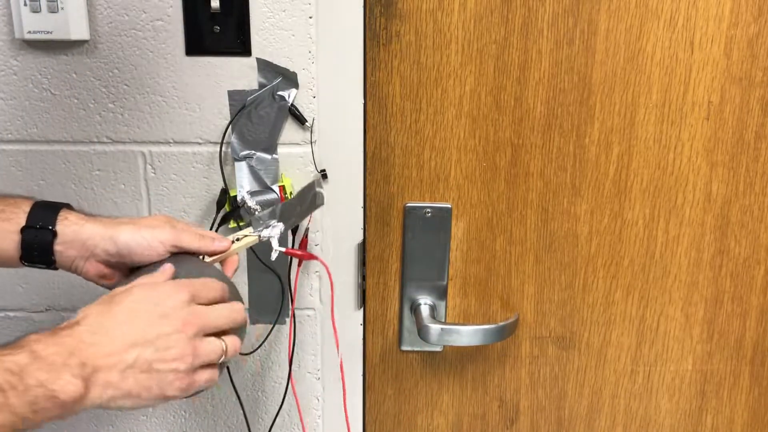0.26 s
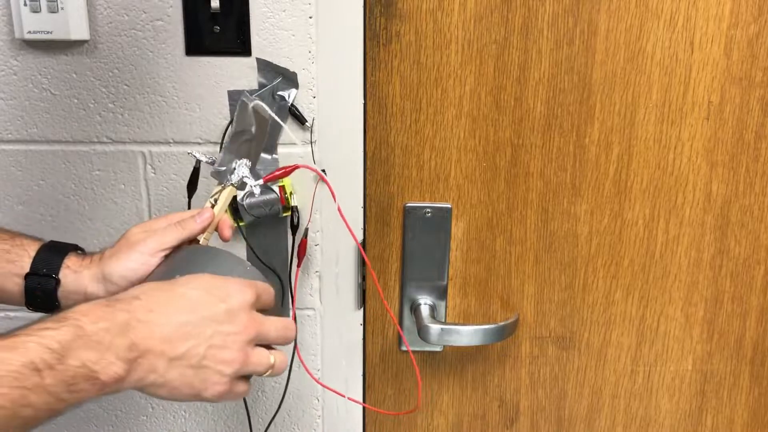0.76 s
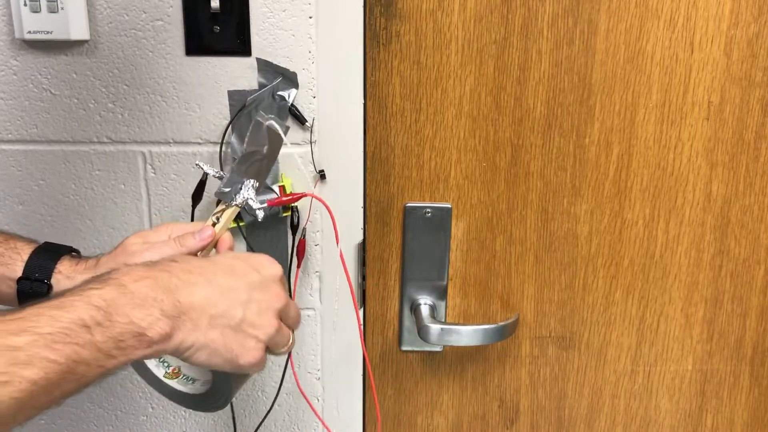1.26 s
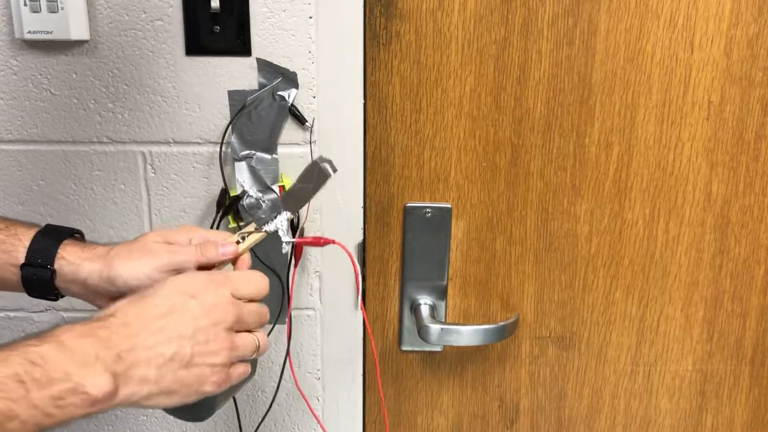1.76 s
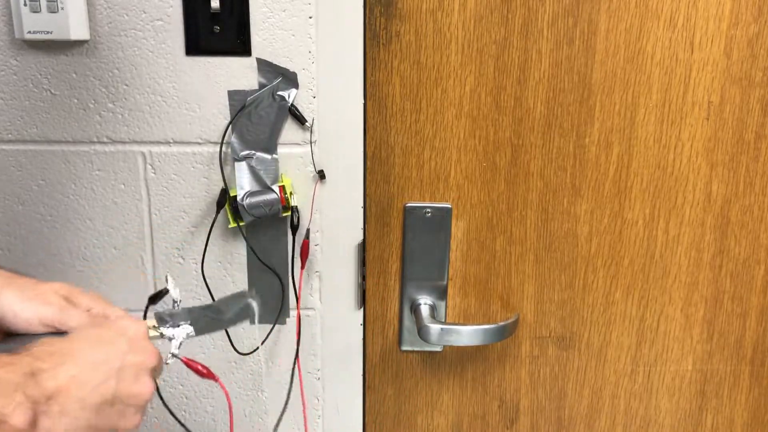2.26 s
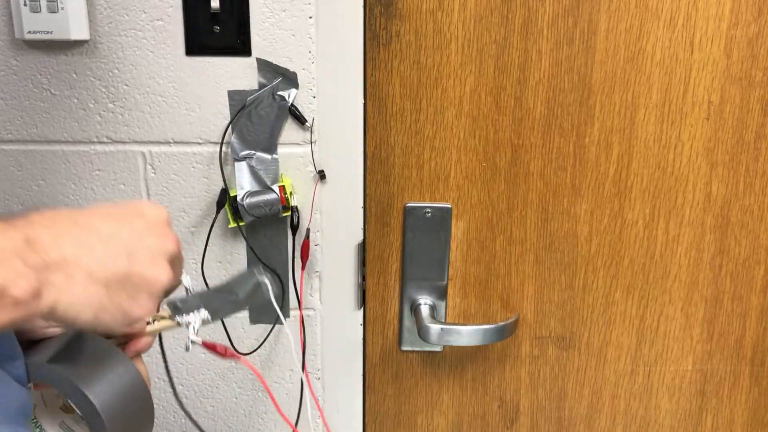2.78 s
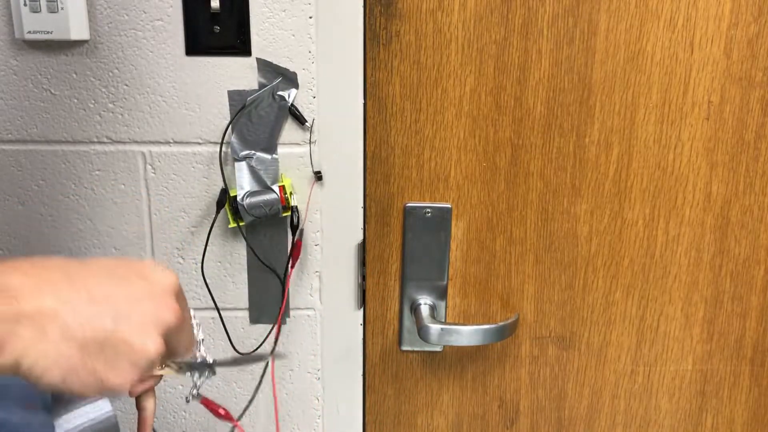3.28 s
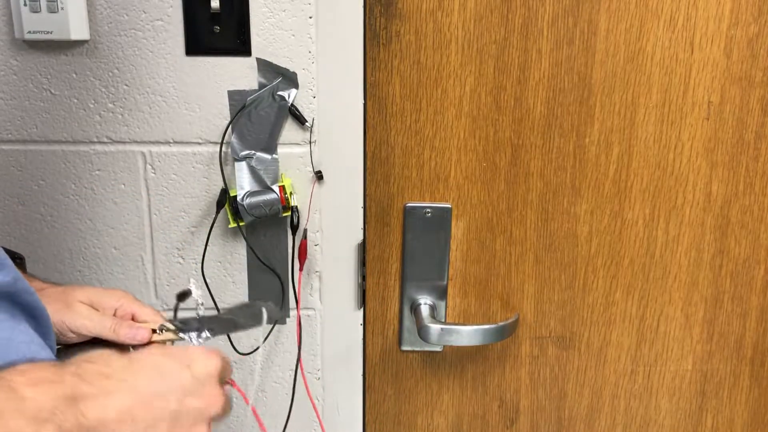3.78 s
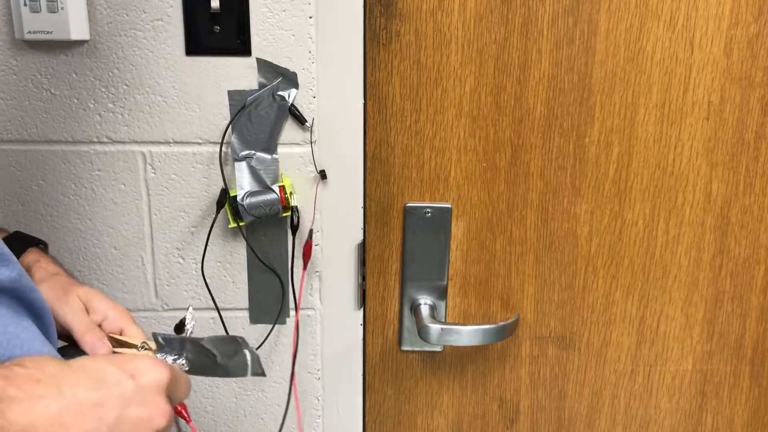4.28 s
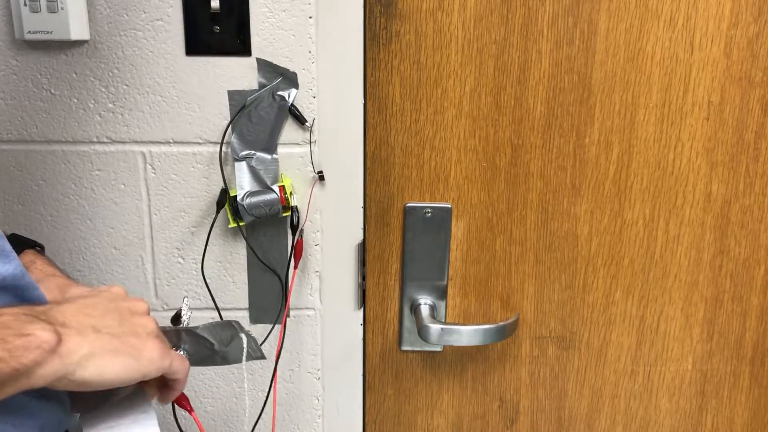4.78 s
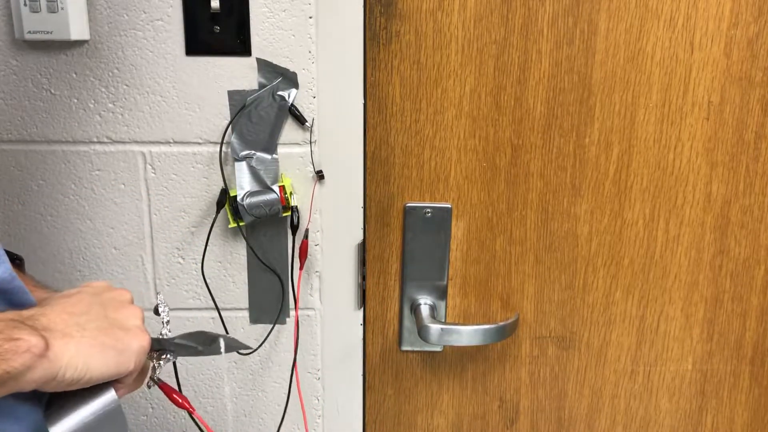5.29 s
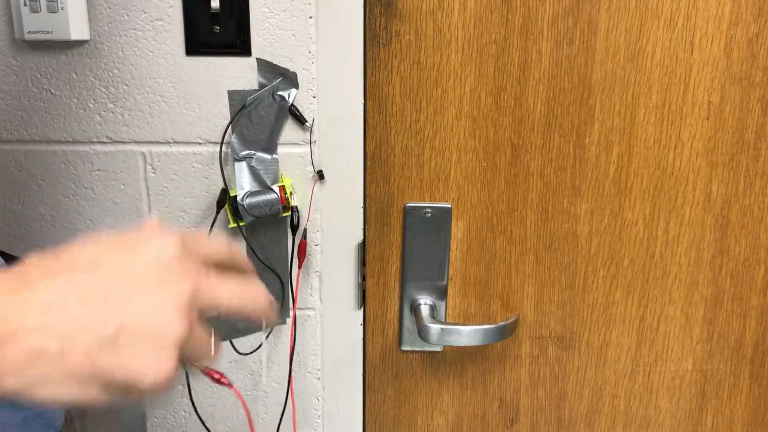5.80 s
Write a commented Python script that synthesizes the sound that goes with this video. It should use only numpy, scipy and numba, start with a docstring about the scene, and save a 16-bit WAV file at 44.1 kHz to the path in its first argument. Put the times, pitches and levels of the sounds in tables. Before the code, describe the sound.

A low, gently wavering ventilation hum with rumble and soft air runs throughout in a hard-walled room; the handling is close, with a short roomy tail. At 0.07 s a small sharp snap sounds, with duller ticks around 0.2 s, then mostly hum. Faint bright crackles and a thin scratch come at 1.4-1.7 s, and a clear snap at 2.0. From 2.3 tape is jerked off its roll: small ticks, then a growing rasp at 2.4-2.5, a strong coarse rip at 2.86-2.95, another falling lower at 3.23-3.3, ending in the hardest cracks at 3.28 and 3.33. Light snaps and rustling follow around 3.5. At 4.12 there is a crisp snap with a tiny rasp, then a faint clip clink at 4.2 and quiet rubbing, with a brief scuff at 4.53. Soft ticks around 5.3 precede a loud double rip at 5.56-5.65, then bright snaps and rustles to 6.

```python
"""Ventilation hums in a hard-walled room; a sharp snap comes first, and later duct tape is jerked off its roll.
Each rasp is stick-slip noise through a moving high-pass: the freed strip grows, so most rasps reach lower. Tape
and glue snap as short filtered jolts, as do a few dry ticks of the peg, and hands rustle as clumped grains of
friction. A clothes peg with metal clips clinks as a sum of decaying modes; one echo and a diffuse tail form the
room. The ventilation is wavering tones, rumble resonances and a soft rush of coloured noise."""
import sys
import numpy as np
from scipy import signal
from scipy.fft import rfft, irfft
from scipy.io import wavfile
from scipy.ndimage import uniform_filter1d
from numba import njit

SR = 44100
rng = np.random.default_rng(int(sys.argv[2]) if len(sys.argv) > 2 else 0)


def master(y):
    """Save y as 16-bit WAV."""
    cut = np.clip(np.atleast_2d(y).T, -1, 1)
    pcm = np.round(cut * 32767)  # scale
    wavfile.write(sys.argv[1], SR, pcm.astype(np.int16))


N = 266496
TIME = np.arange(N) / SR


def from_db(db):
    """Level to amplitude: 20 dB is a factor of ten."""
    return 10 ** (np.asarray(db) / 20)


def rms_one(x):
    """Normalise the effective value: scale to unit rms."""
    return x / np.sqrt(np.mean(x ** 2) + 1e-20)


def at_hz(points, hz):
    """Interpolate a table linearly on a logarithmic frequency axis."""
    known_hz, values = np.transpose(points)
    return np.interp(np.log(np.maximum(hz, 1)), np.log(known_hz), values)


def add(out, s, sound):
    """Superposition: mix a sound in at time s."""
    start = max(round(s * SR), 0)
    out[start:start + len(sound)] += sound[:N - start]


def band(x, low_hz, high_hz):
    """Causal Butterworth band-pass."""
    edges_hz = [low_hz, min(high_hz, SR / 2 - 1)]
    return signal.sosfilt(signal.butter(2, edges_hz, "band", fs=SR, output="sos"), x)


def colour(x, spectrum, size=8192):
    """Minimum-phase filter, found by folding the cepstrum; it keeps the power of white noise."""
    bins_hz = np.arange(size // 2 + 1) * SR / size
    cepstrum = irfft(np.log(from_db(at_hz(spectrum, bins_hz))))
    cepstrum[1:size // 2] *= 2
    cepstrum[size // 2 + 1:] = 0
    response = irfft(np.exp(rfft(cepstrum)))
    return signal.fftconvolve(x, response / np.linalg.norm(response))[:len(x)]


def brighten(x, bright_db, pivot_hz=2200):
    """Spectral tilt: raise treble against bass about a pivot."""
    body = signal.lfilter(*signal.butter(1, pivot_hz, fs=SR), x)
    tilt = from_db(bright_db / 2)
    return body / tilt + (x - body) * tilt


def narrow_noise(hz, width_hz):
    """Noise-driven resonance of unit rms; at 0 Hz it is a slow drift."""
    bins_hz = np.arange(N // 2 + 1) * SR / N
    spectrum = rfft(rng.standard_normal(N)) / (1 + ((bins_hz - hz) / width_hz) ** 2)
    return rms_one(irfft(spectrum, N))


@njit
def moving_highpass(x, step, damping):
    """Resonant two-pole high-pass; step = tan(pi f / SR) and damping (1 / Q) are given for each sample."""
    out, mid, low = np.zeros(len(x)), 0., 0.
    for i in range(len(x)):
        g, loss = step[i], damping[i] + step[i]
        out[i] = (x[i] - loss * mid - low) / (1 + g * loss)
        low += 2 * g * (mid + g * out[i])
        mid += 2 * g * out[i]
    return out


def peel(length_s, level_db, attack_s, from_hz, to_hz, damping, bright_db, slips_per_s, uneven_db, ring_hz,
         jitter=.35, slip_s=0.00042, fizz=0.33, even_s=0.0086):
    """Stick-slip: glue holds and slips; each slip snaps a bunch of threads that shake strip and roll."""
    # colour of the peeling tape: f/Hz, relative level/dB per Hz
    tape_spectrum = [(150, 1), (280, -3.5), (390, -4), (550, -5), (780, -4.5), (1050, -0.5), (1550, -1),
                     (2100, -2), (3000, 0.5), (4300, 0.5), (6500, -0.5), (11000, -2.5), (14500, -6),
                     (17000, -30)]
    swell_db, release_db_per_s, release_s = 23, 1115, 0.011
    dulling_db_per_octave = 4.5
    roll_ring_db, roll_spread = -6, 1.57   # ring strength; ratio of its band edges to the centre
    t = np.arange(0, length_s + release_s, 1 / SR)
    freed = np.minimum(t / length_s, 1)   # share of this tug's tape that is off the roll
    edge_hz = from_hz * (to_hz / from_hz) ** freed

    # a tug swells, holds, and dies as the hand stops
    swell = -swell_db * np.exp(-t / attack_s)
    effort_db = swell - release_db_per_s * np.maximum(t - length_s, 0)

    # slips of random spacing and strength
    draws = rng.standard_normal((N // 20, 2))
    gaps = np.exp(jitter * draws[:, 0]) / slips_per_s
    at = ((np.cumsum(gaps) - gaps[0]) * SR).astype(int)
    inside = at < len(t)
    slips = np.bincount(at[inside], from_db(uneven_db * draws[inside, 1]), len(t))

    # each slip decays exponentially over a steady fizz
    release = signal.lfilter([1], [1, -np.exp(-1 / (slip_s * SR))], slips) + fizz
    threads = release * rng.standard_normal(N)[:len(t)]
    # even out the local loudness, so that the tug's own envelope sets the level
    threads /= np.sqrt(uniform_filter1d(threads ** 2, int(even_s * SR)))

    # a short strip is brighter
    octaves = np.log2(edge_hz / np.sqrt(from_hz * to_hz))
    rasp = brighten(colour(threads, tape_spectrum), bright_db + dulling_db_per_octave * octaves)
    # the grip decides where the roll rings
    rasp = rasp + from_db(roll_ring_db) * band(rasp, ring_hz / roll_spread, ring_hz * roll_spread)
    # the strip sings at its lowest resonance and radiates little below it
    rasp = moving_highpass(rasp, np.tan(np.pi * edge_hz / SR), np.full(len(t), damping))
    return from_db(level_db + effort_db) * rasp


def pulls():
    """Superposition of the rasps, each with its own stick-slip rate and strip resonance."""
    # tugs on the roll: start t/s, length t/s, level before filtering/dB, attack time constant t/s,
    # lowest strip resonance at the start f/Hz and at the end f/Hz, its damping (1 / Q), brightness/dB,
    # median slip rate/(1/s), unevenness of the slips/dB, ring of the roll f/Hz
    tugs = [ (1.581, 0.044, -42.5, 0.012, 4200, 3500, 2.3, 5.5, 290, 5, 6650),
            (1.619, 0.019, -47, 0.0044, 1720, 1560, 0.1, 10, 370, 1, 6500),
            (1.646, 0.036, -43.5, 0.00072, 750, 480, 0.52, 3.5, 370, 6, 6100),
            (2.315, 0.014, -42.5, 0.00078, 3400, 1100, 1, 7.5, 490, -12, 4630),
            (2.334, .016, -49, 0.0031, 760, 520, 0.17, -11, 550, 7, 4630),
            (2.363, 0.02, -49, 0.00085, 3460, 2620, 1, 12.5, 200, 8, 6340),
            (2.415, 0.074, -33, 0.01, 1500, 646, 1.17, -4, 478, 3, 4760),
            (2.484, 0.035, -31.5, 0.00078, 400, 266, 0.47, -7.5, 478, 3, 4860),
            (2.86, 0.06, -26, 0.0055, 606, 226, 0.58, -3.5, 372, -1, 1240),
            (2.935, 0.0085, -25.5, 0.0011, 250, 220, 0.37, -7.5, 403, 5.5, 1180),
            (3.229, 0.057, -28, .003, 1000, 191, 0.98, -8.5, 398, 3, 1500),
            (3.298, 0.006, -28, 0.0014, 175, 165, 0.42, -15, 300, -4, 1420),
            (3.321, 0.019, -43.5, .003, 180, 200, 0.54, -25, 350, 13, 1420),
            (4.123, 0.013, -35, 0.0031, 1700, 1150, 1, 1, 400, 11, 5800),
            (4.149, 0.063, -56.5, 0.0015, 950, 875, 0.7, -10, 434, 8, 5730),
            (5.562, 0.054, -27, 0.0092, 2040, 1180, 0.93, -6.5, 230, 12, 3100),
            (5.606, .044, -25.5, 0.00058, 620, 322, 1.0, 0.5, 325, 2.5, 3900), ]
    out = np.zeros(N)
    for s, *tug in tugs:
        add(out, s, peel(*tug))
    return out


def snap(bright_db, low_db=-13, low_follows=0.75, crack_db=-6, crack_t60=0.0097,
         flutter_db=-27, flutter_t60=0.098, size=2048):
    """Impulsive release: a crease or glue thread jolts and cracks, then the film flutters; peak 1."""
    t = np.arange(size) / SR
    crack_decay = from_db(crack_db - 60 * t / crack_t60)
    flutter_decay = from_db(flutter_db - 60 * t / flutter_t60)
    burst = rng.standard_normal(size) * (crack_decay + flutter_decay)
    burst[0] = 1   # the jolt
    low = low_db - low_follows * bright_db   # a bright snap has less bass
    spectrum = [(200, low - 23), (700, low - 12.5), (1150, low),
                (4000, -3.5), (10000, bright_db - 4.5), (16000, bright_db - 8)]
    crack = colour(burst, spectrum, size=1024)
    return crack / np.abs(crack).max()


def snaps(gain_db=-7.0):
    """Superposition of impulsive releases between and within the tugs, and of a few dry ticks of the peg."""
    # sharp snaps of tape and glue, and a few dry ticks of the peg: t/s, peak level before the common gain/dB,
    # brightness/dB
    releases = [(0.0707, -23.5, 0.5), (0.201, -43, -10), (0.2378, -26.5, -20.5), (1.3972, -37, 5),
                (1.478, -32.5, 10), (1.5488, -30, 17), (1.9827, -17.5, 7), (2.3181, -20.5, 2),
                (2.365, -20.5, 14), (2.388, -22, 10), (2.633, -30, -6.5), (2.8503, -31.5, 2),
                (3.2828, -10, 13), (3.3348, -14, -2.5), (3.5164, -27.5, -6.5), (3.593, -27, -2),
                (4.1023, -28.5, -18), (4.1251, -14.5, 3), (4.816, -48, -15), (5.2605, -38.5, -7),
                (5.2943, -36, -20), (5.444, -29, -9.5), (5.5213, -23, -12), (5.5468, -22, -10.5),
                (5.609, -12, -12), (5.787, -27.5, 25), (5.8162, -19, 9.5), (5.9648, -17.5, -0.5)]
    out = np.zeros(N)
    for s, peak_db, bright_db in releases:
        add(out, s, from_db(peak_db + gain_db) * snap(bright_db))
    return out


def clinks(gain_db=-10.5, ring_db=5.5, detune=0.0075, scatter_db=3, size=8192):
    """Modal synthesis: each touch strikes the peg's modes anew, shifted a little by the grip."""
    # clinks of the peg and its clips: t/s, strike level before the common gain/dB
    touches = [(3.1425, -46), (3.4585, -47.5), (4.0623, -47), (4.2195, -37), (4.4285, -46.5),
               (4.594, -51.5), (5.794, -47)]
    # modes of the peg: f/Hz, relative level before ring and scatter/dB, decay time t60/s
    peg_modes = [(1370, -19, 0.014), (2240, -7, 0.017), (2752, 0, 0.046), (2830, -19, 0.022),
                 (3380, -9, 0.011), (4300, 3, 0.006), (5700, -6, 0.015), (9000, -7, 0.0044)]
    out, t = np.zeros(N), np.arange(size) / SR
    hz, mode_db, t60 = np.array(peg_modes).T[:, :, None]
    for s, peak_db in touches:
        # long-lived modes are favoured, and each touch excites the modes a little differently
        strength_db = mode_db + ring_db * t60 / t60.max() + scatter_db * rng.standard_normal(hz.shape)
        gripped_hz = hz * (1 + detune * rng.standard_normal(hz.shape))
        modes = from_db(strength_db - 60 * t / t60) * np.sin(2 * np.pi * gripped_hz * t)
        modes *= rng.choice([-1, 1], hz.shape)
        add(out, s, from_db(peak_db + gain_db) * modes.sum(axis=0))
    return out


def rubbing(grains_per_s=4000, grain_db=3.5, clump_db=3.0, clump_hz=50, fade_ratio=1.04):
    """Sliding friction: hands on tape and sleeve make strokes of fine grains that come in clumps."""
    # strokes: peak t/s, level before brightening/dB, swell width t/s, brightness/dB
    strokes = [(0.247, -62.5, 0.01, -12.5), (2.15, -67.5, 0.028, -5), (2.68, -70.5, 0.19, 1),
               (3.139, -60.5, 0.051, -4.5), (3.52, -62.5, 0.072, -2), (3.80, -68, 0.16, -4.5),
               (4.3, -74, 0.42, -7), (4.534, -48, 0.0086, 0), (4.97, -75.5, 0.032, 13.5),
               (5.10, -62.5, 0.0088, -9), (5.29, -70, 0.034, -3), (5.53, -59.5, 0.036, -8),
               (5.85, -62.5, 0.053, 10.5), (5.908, -48, 0.015, -6), (5.963, -39, 0.0039, -12)]
    # colour of the friction: f/Hz, relative level/dB per Hz
    friction_spectrum = [(200, -16), (450, -2), (1000, 6.5), (1800, 2.5), (2800, 7), (5000, 2.5),
                         (9000, 0.5), (15000, -5)]
    struck = rng.random(N) < grains_per_s / SR
    signs = rng.choice([-1, 1], N)
    grains = struck * signs * from_db(grain_db * np.minimum(rng.exponential(1, N), 4))
    clumps = from_db(clump_db * narrow_noise(0, clump_hz))
    friction = rms_one(colour(grains * clumps, friction_spectrum))
    out = np.zeros(N)
    for s, level_db, swell_s, bright_db in strokes:
        width_s = np.where(TIME < s, swell_s, fade_ratio * swell_s)   # the fade is slightly slower
        stroke = np.exp(-.5 * np.minimum(np.abs(TIME - s) / width_s, 10) ** 2)
        out += from_db(level_db) * stroke * brighten(friction, bright_db)
    return out


def room(x, wall_s=.0042, wall_db=-11, tail_db=-7.5, build_s=0.0012, size=32768):
    """Reverberation: one echo from the near wall and a diffuse tail with its own decay in each band."""
    # reverberation time: f/Hz, t60/s
    decay_times = [(150, 0.43), (500, 0.38), (1500, 0.23), (4000, 0.27), (8000, 0.19), (16000, 0.17)]
    t, tail = np.arange(size) / SR, np.zeros(size)
    edges_hz = np.geomspace(100, 18000, 12)
    for low_hz, high_hz in zip(edges_hz, edges_hz[1:]):
        t60 = at_hz(decay_times, np.sqrt(low_hz * high_hz))
        tail += band(rng.standard_normal(size), low_hz, high_hz) * from_db(-60 * t / t60)
    tail *= 1 - np.exp(-t / build_s)
    response = from_db(tail_db) * tail / np.linalg.norm(tail)
    response[round(wall_s * SR)] += from_db(wall_db)
    return x + signal.fftconvolve(x, response)[:N]


def ventilation(waver_hz=1.0, air_db=-54):
    """Periodic and broadband sources: fan and motor tones over duct rumble and a soft rush of air."""
    # tones: f/Hz, rms level/dB, waver/dB (its sign only inverts the drift)
    hum_tones = [(56.8, -47.5, -2.5), (60.9, -60, 5.5), (121.9, -48.5, 2)]
    # rumble resonances: f/Hz, half-width at -6 dB f/Hz, rms level/dB
    rumble_bands = [(65, 1.8, -56.5), (155, 15.8, -54.5), (237.2, 22, -67.5)]
    # rush of air: f/Hz, relative level/dB per Hz
    air_spectrum = [(18, -39), (32, -6), (45, -5), (62, 1), (90, -3), (130, -5), (175, -10), (210, -19),
                    (300, -17), (450, -24.5), (800, -31.5), (2000, -36), (5000, -42), (14000, -49)]
    out = np.zeros(N)
    for hz, level_db, waver_db in hum_tones:
        waver = from_db(waver_db * narrow_noise(0, waver_hz))
        tone = np.sin(2 * np.pi * (hz * TIME + rng.random()))
        out += from_db(level_db) * rms_one(waver * tone)
    for hz, width_hz, level_db in rumble_bands:
        out += from_db(level_db) * narrow_noise(hz, width_hz)
    return out + from_db(air_db) * colour(rng.standard_normal(N), air_spectrum)


def scene():
    """Superposition: the hands' work reverberates in the room, over the ventilation."""
    handwork = pulls() + snaps() + clinks() + rubbing()
    return (room(handwork) + ventilation())[None]


def record(dry, cutoff_hz=16100):
    """Band limitation: a steep elliptic low-pass cuts the top."""
    return signal.sosfilt(signal.ellip(10, .1, 80, cutoff_hz, fs=SR, output="sos"), dry)


dry = scene()
out = record(dry)
master(out)
```